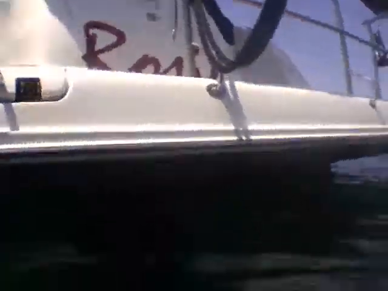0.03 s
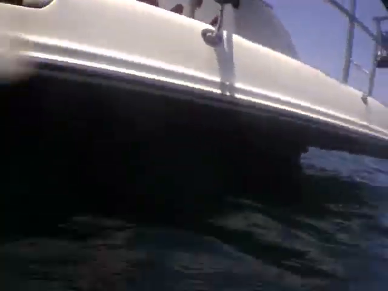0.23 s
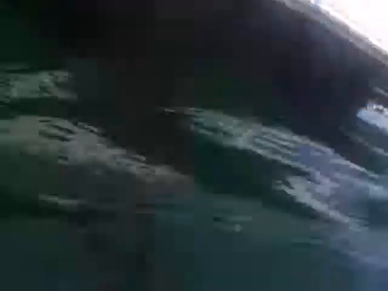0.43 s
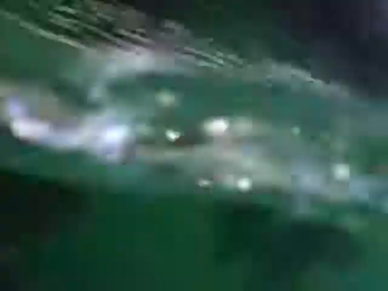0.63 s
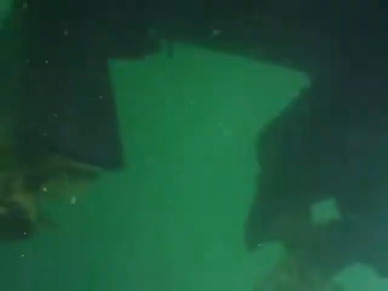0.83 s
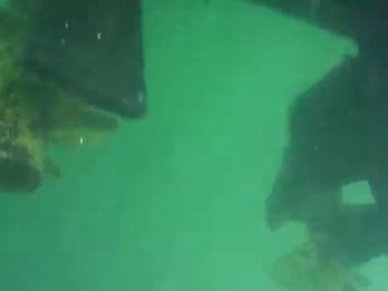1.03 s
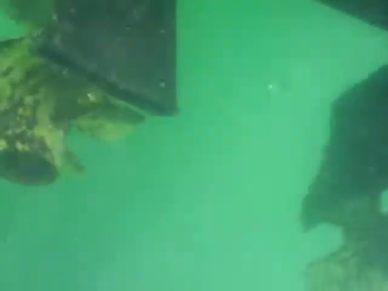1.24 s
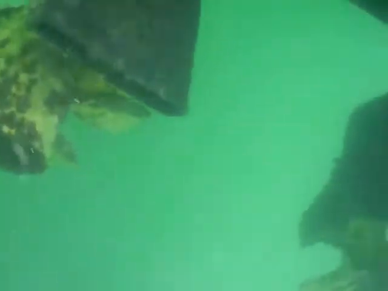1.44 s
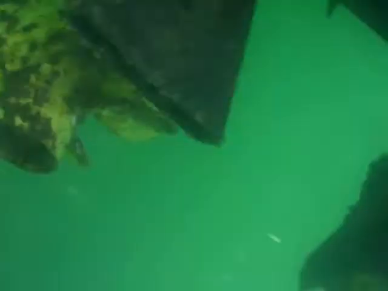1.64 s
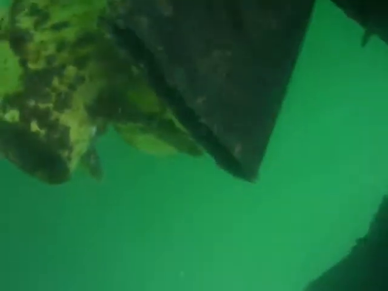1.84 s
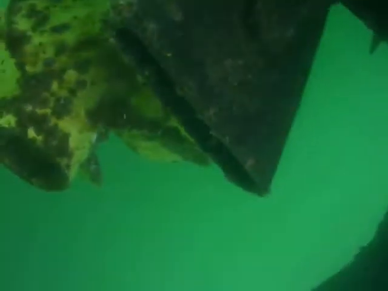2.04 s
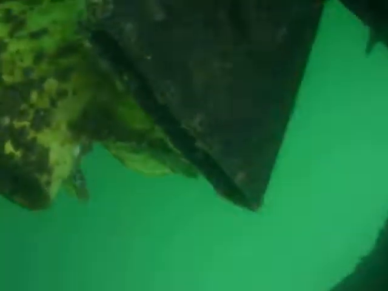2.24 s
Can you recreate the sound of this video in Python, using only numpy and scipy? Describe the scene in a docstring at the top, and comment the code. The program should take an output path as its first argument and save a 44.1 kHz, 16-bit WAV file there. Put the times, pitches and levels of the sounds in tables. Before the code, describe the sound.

Gurgling splash as a cased camera is dunked beside a boat, after handling bumps, then dull glugs

```python
"""A hand rubs and bumps a camera's watertight case beside a boat, then the case plunges under with a gurgle.
Rubbing is coloured noise; knocks and pushes are heavily damped rings; sharp ticks are short noise bursts.
Air pockets ring one by one over froth, fizz and spray, made of random small bubbles and noise.
Under water, dull knocks, a brief scrape, low glugs and a slow sway remain.
The camera's own hiss, whine and tiny ticking run throughout, and a faint whirr joins late."""
import sys
import numpy as np
from scipy import signal
from scipy.fft import rfft, irfft, next_fast_len
from scipy.io import wavfile

SR = 44100
rng = np.random.default_rng(int(sys.argv[2]) if len(sys.argv) > 2 else 0)


def master(y):
    """Save y as 16-bit WAV."""
    cut = np.clip(np.atleast_2d(y).T, -1, 1)
    pcm = np.round(cut * 32767)  # scale
    wavfile.write(sys.argv[1], SR, pcm.astype(np.int16))


N = 101429  # length in samples

# Camera hiss colour. Each row: frequency in Hz, relative level in dB.
HISS_COLOUR = [(530, -6), (900, -9), (1370, -15.5), (1750, -13), (2070, -9), (2480, -16), (2890, -17.5),
               (13800, -15), (15500, -28)]
HISS_DB = -69.5
# Colour of the faint whirr. Each row: frequency in Hz, relative level in dB.
WHIRR_COLOUR = [(1000, -45), (1750, -3), (2080, -10), (2350, -60)]
WHIRR_START_S, WHIRR_FADE_S, WHIRR_DB = 1.795, 0.11, -74.5
WHINE_HZ, WHINE_DB = 7500, -82
# Tiny falling chirps of the electronics
BUZZ_FIRST_S, BUZZ_PERIOD_S, BUZZ_LENGTH_S = 0.017, 0.0346, 0.0042
BUZZ_START_HZ, BUZZ_FALL_HZ_PER_S = 7260, 650000
BUZZ_DB, BUZZ_VARIATION_DB = -64, 4  # mean and standard deviation

# Hand rubbing on the case. Each row: time in seconds, level in dB.
RUB_LEVEL = [(0, -55), (.045, -46), (.08, -54.5), (.135, -73), (.2, -52.5), (.278, -52.5), (.30, -57),
             (.35, -52.5), (.44, -82), (.56, -63), (.68, -76), (1.6, -82), (1.67, -62), (1.73, -78)]
# Colour of the rubbing. Each row: frequency in Hz, relative level in dB.
RUB_COLOUR = [(200, -18.5), (330, 2), (490, -18.5), (650, -5), (1430, 1.5), (1610, -2), (4330, -9.5),
              (6610, -24), (15000, -48)]

# Low churning of water. Each row: time in seconds, level in dB.
CHURN_LEVEL = [(0, -66.5), (.3, -54), (.56, -64.5), (.64, -50), (1.05, -52), (1.3, -58), (1.48, -53.5),
               (1.65, -47), (1.83, -60), (1.97, -42.5), (2.08, -47), (2.14, -48.5), (2.24, -45)]
GLUGS_PER_S, GLUG_HZ, GLUG_SPREAD, GLUG_Q = 240, 200, 0.6, 2.4
# Slow sway of pressure, calmer below the surface. Each row: time in seconds, level in dB.
SWAY_LEVEL = [(.95, -39.5), (1.25, -41.5)]
# Colour of the sway. Each row: frequency in Hz, relative level in dB.
SWAY_COLOUR = [(25, 7), (50, -8), (100, -17), (1000, -100)]

# Sharp ticks on the case. Each row: start in seconds, level in dB.
TICKS = [(0.279, -34), (0.292, -40), (0.401, -47), (0.473, -47), (0.4888, -43.5), (0.643, -28.5),
         (.656, -30), (0.667, -29.5), (0.688, -38), (0.713, -34.5), (0.766, -34), (0.7815, -30),
         (0.85, -35), (0.876, -25), (1.009, -30.5), (1.058, -48), (1.2613, -35), (1.328, -51)]
# Colour of the ticks. Each row: frequency in Hz, relative level in dB.
TICK_COLOUR = [(200, 11.5), (1200, 10), (4200, 2), (5500, -8.5), (10500, -23.5), (13000, -22),
               (16000, -29.5)]
TICK_ATTACK_S, TICK_T60_S = 0.000086, 0.023

# Slow pushes of hand and water. Each row: start in seconds, pitch in Hz, level in dB,
# sharpness Q (at least 1 is used).
PUSHES = [(0.279, 43.4, -8.5, 1.8), (.303, 62, -21, 5), (0.393, 29.4, -16, 2.8), (0.4757, 59.3, 3.5, 0.8),
          (0.683, 23.7, -21, 2.3)]
PUSH_ONSET_S = 0.015
# Dull knocks. Each row: start in seconds, pitch in Hz, level in dB before the case colours it.
KNOCKS = [(0.4208, 176, -17.5), (.4855, 220, -12), (0.6431, 388, -3), (1.140, 163, -33.5),
          (1.2513, 420, -13), (1.3996, 195, -25.5), (1.512, 230, -33), (1.5501, 155, -34),
          (1.6207, 176, -30.5), (1.6993, 195.3, -27.5), (1.7553, 174.7, -23), (1.954, 450, -19),
          (1.9654, 162, -24.5), (2.0211, 321, -16), (2.0425, 216, -19), (2.1034, 222, -21),
          (2.157, 154.2, -20), (2.2322, 167, -37)]
KNOCK_Q, KNOCK_ONSET_S = 1.6, 0.0015
# What the case walls let through, with their resonances. Each row: frequency in Hz, gain in dB.
CASE_COLOUR = [(40, -14), (125, 1.5), (175, -3), (225, -2.5), (270, -5.5), (325, -1.5), (440, -12),
               (650, 2.5), (850, -23), (3000, -56)]

# Froth round the case. Each row: time in seconds, level in dB.
FROTH_LEVEL = [(0.605, -63.5), (0.64, -53), (.73, -48.5), (0.791, -38.5), (.85, -39.5), (0.899, -41),
               (0.927, -58.5), (.937, -32), (0.957, -46), (1.029, -45.5), (1.078, -59.5), (1.3, -66.5)]
# Froth as heard through the case. Each row: frequency in Hz, gain in dB.
FROTH_COLOUR = [(450, -7), (820, 4.5), (1300, -5), (2000, 5.5), (2480, -11), (3000, -4.5), (4300, -7.5),
                (5400, -22), (15000, -35)]
FROTH_PER_S, FROTH_HZ, FROTH_SPREAD, FROTH_Q = 980, 1962, 0.7, 9.2
FROTH_RISE = 0.13  # share by which a small bubble's pitch climbs as it rings out
FIZZ_DB = -11  # relative to the froth level
# Fine bright spray as the surface closes over the case. Each row: time in seconds, level in dB.
SPRAY_LEVEL = [(.6, -75), (0.652, -51), (.75, -78), (.79, -70), (.815, -52), (0.874, -51.5), (.89, -80)]
SPRAY_PER_S, SPRAY_HZ, SPRAY_SPREAD, SPRAY_Q = 200, 10700, 0.9, 14
SWARM_VARIATION_DB = 5  # two random draws of up to this much add for each bubble

# Air pockets that ring as they pinch off. Each row: start in seconds, pitch in Hz, level in dB,
# sharpness Q.
AIR_POCKETS = [(0.6302, 4120, -31.5, 23), (0.6431, 1283, -7.5, 3.3), (.651, 3840, -20.5, 8.7),
               (0.666, 3025, -16, 16.4), (0.6895, 1930, -16.5, 5.4), (0.7008, 690, -16, 11),
               (0.7147, 3810, -19, 18), (0.7352, 1957, -24, 23), (0.7428, 814, -16, 5),
               (0.766, 1980, -10, 9.7), (0.7724, 1713, 3, 6.5), (0.7728, 905, -23.5, 13),
               (0.78, 2820, -3, 4), (.7885, 2059, -19, 12), (0.795, 3100, -14.5, 7.1),
               (0.8123, 8700, -34.5, 39), (.8135, 1970, -26.5, 10), (0.8176, 920, -17, 6),
               (.8495, 3280, -16, 5.7), (0.8677, 1360, -14.5, 3.7), (.8764, 735, -4.5, 7.8),
               (0.8796, 4420, -14, 11.5), (0.8873, 1730, -18, 8.5), (.907, 2880, -31, 19),
               (0.9109, 1225, -22, 10.3), (.9385, 1060, 1, 2.57), (0.9715, 3870, -15.5, 10.5),
               (1.0074, 775, -11, 9), (1.0219, 800, -24.5, 10.8), (1.022, 2030, -25, 10.8),
               (1.0541, 670, -8.5, 3.5), (1.0555, 1722, -28.5, 24), (1.098, 1750, -28, 17.4),
               (1.140, 800, -36, 3.4), (1.187, 1840, -44, 14), (1.2618, 7430, -13.5, 3.74),
               (1.2625, 950, -27.5, 2.7), (1.269, 3970, -31.5, 12), (1.3274, 1050, -42, 7.7)]
POCKET_RISE = 0.048  # share by which an air pocket's pitch climbs as it rings out
ONSET_CYCLES = 0.89  # soft start of every bubble, in periods of its own pitch
NECK_S = 0.000092  # time for an air pocket's neck to close

# Colour of the short answer of hull and case. Each row: frequency in Hz, relative level in dB.
ECHO_COLOUR = [(300, -17), (850, 8), (2100, -1), (2450, -8), (3000, -3.5), (5500, -27.5)]
ECHO_DB, ECHO_T60_S, ECHO_ONSET_S = -15.5, 0.01, 0.003
TOP_HZ = 15850  # band limit of the camera


def amp(db):
    """Turn decibels into an amplitude factor."""
    return 10 ** (np.asarray(db) / 20)


def unit(x):
    """Scale a sound to rms 1."""
    return x / np.sqrt(np.mean(x ** 2) + 1e-20)


def along(points, hz):
    """Read a curve of (Hz, value) points on a log frequency axis."""
    f, v = np.transpose(points)
    return np.interp(np.log(hz + 1), np.log(f + 1), v)


def level(rows):
    """Gain per sample from (seconds, dB) points."""
    return amp(np.interp(np.arange(N) / SR, *np.transpose(rows)))


def filtered(x, response):
    """Multiply the spectrum of x by a response of frequency."""
    size = next_fast_len(N + SR // 2)
    hz = np.fft.rfftfreq(size, 1 / SR)
    return irfft(rfft(x, size) * response(hz), size)[:N]


def noise(colour):
    """Coloured noise of rms 1."""
    white = rng.standard_normal(N)
    return unit(filtered(white, lambda hz: amp(along(colour, hz))))


def through(x, colour):
    """Pass x through a body whose minimum-phase response rings only after each impulse."""
    size = 16384
    gain = amp(along(colour, np.fft.rfftfreq(size, 1 / SR)))
    # Folding the cepstrum onto positive time gives minimum phase
    cepstrum = irfft(np.log(gain))
    cepstrum[1:size // 2] *= 2
    cepstrum[size // 2 + 1:] = 0
    impulse = irfft(np.exp(rfft(cepstrum)))
    return signal.fftconvolve(x, impulse)[:N]


def add(out, s, sound):
    """Mix a sound in at time s."""
    part = out[max(0, round(s * SR)):][:len(sound)]
    part += sound[:len(part)]


def ring(hz, q, onset_s, rise=0, size=8192):
    """A damped oscillation with a soft start, whose pitch may climb as it dies."""
    t = np.arange(size) / SR
    fade = np.exp(-np.pi * hz * t / max(q, 1))
    pitch = hz * (1 + rise * (1 - fade))
    phase = 2 * np.pi * np.cumsum(pitch) / SR
    onset = 1 - np.exp(-(t / onset_s) ** 2)
    return np.sin(phase) * fade * onset


def swarm(start, end, per_s, centre_hz, spread, q, rise):
    """Bubbles of random time, pitch and strength, together of rms 1 from start to end."""
    out = np.zeros(N)
    draws = rng.uniform(-1, 1, (2000, 5))
    count = int(per_s * (end - start))
    for when, a, b, c, d in draws[:count]:
        s = start + (end - start) * (when + 1) / 2
        hz = centre_hz * np.exp(spread * (a + b))  # two draws favour the centre
        strength = amp(SWARM_VARIATION_DB * (c + d))
        add(out, s, strength * ring(hz, q, ONSET_CYCLES / hz, rise, size=2048))
    return unit(out) * np.sqrt((end - start) * SR / N)


def hiss():
    """The camera's own noise, steady and coloured."""
    return amp(HISS_DB) * noise(HISS_COLOUR)


def whine():
    """A thin steady whine, one pure sine."""
    return amp(WHINE_DB) * np.sin(2 * np.pi * WHINE_HZ * np.arange(N) / SR)


def buzz():
    """Regular tiny ticks of the electronics, each a short sine of falling pitch."""
    out = np.zeros(N)
    t = np.arange(int(BUZZ_LENGTH_S * SR)) / SR
    cycles = (BUZZ_START_HZ - BUZZ_FALL_HZ_PER_S * t / 2) * t
    chirp = np.hanning(len(t)) * np.sin(2 * np.pi * cycles)
    for s in np.arange(BUZZ_FIRST_S, N / SR, BUZZ_PERIOD_S):
        add(out, s, amp(BUZZ_DB + rng.normal(0, BUZZ_VARIATION_DB)) * chirp)
    return out


def rub():
    """Friction noise: a soft rustle while the camera is lowered, a brief scrape under water."""
    return level(RUB_LEVEL) * noise(RUB_COLOUR)


def glugs():
    """Low churning: a string of dull bubbles heard through the resonant case."""
    low_bubbles = swarm(0, N / SR, GLUGS_PER_S, GLUG_HZ, GLUG_SPREAD, GLUG_Q, 0)
    return level(CHURN_LEVEL) * unit(through(low_bubbles, CASE_COLOUR))


def sway():
    """Slow random swings of pressure, as very low noise."""
    return level(SWAY_LEVEL) * noise(SWAY_COLOUR)


def ticks():
    """Fingers, drops and bursting bubbles snap against the case: quick bursts of noise."""
    envelope = np.zeros(N)
    t = np.arange(SR // 10) / SR
    attack = 1 - np.exp(-t / TICK_ATTACK_S)
    for s, db in TICKS:
        add(envelope, s, attack * amp(db - 60 * t / TICK_T60_S))
    return envelope * noise(TICK_COLOUR)


def pushes():
    """Slow pushes of hand and water, as low damped swings of pressure."""
    out = np.zeros(N)
    for s, hz, db, q in PUSHES:
        add(out, s, amp(db) * ring(hz, q, PUSH_ONSET_S))
    return out


def knocks():
    """Heavily damped knocks that set the case humming."""
    blows = np.zeros(N)
    for s, hz, db in KNOCKS:
        add(blows, s, -amp(db) * ring(hz, KNOCK_Q, KNOCK_ONSET_S))  # first swing is negative
    return through(blows, CASE_COLOUR)


def froth():
    """Small ringing bubbles on a bed of fizz noise, heard through the case."""
    start, end = FROTH_LEVEL[0][0], FROTH_LEVEL[-1][0]
    small = swarm(start, end, FROTH_PER_S, FROTH_HZ, FROTH_SPREAD, FROTH_Q, FROTH_RISE)
    fizz = amp(FIZZ_DB) * noise(FROTH_COLOUR)
    return level(FROTH_LEVEL) * (through(small, FROTH_COLOUR) + fizz)


def spray():
    """The tiniest bubbles, ringing high and at steady pitch."""
    start, end = SPRAY_LEVEL[0][0], SPRAY_LEVEL[-1][0]
    return level(SPRAY_LEVEL) * swarm(start, end, SPRAY_PER_S, SPRAY_HZ, SPRAY_SPREAD, SPRAY_Q, 0)


def air_pockets():
    """Large air pockets of the plunge, each ringing on one rising note as it pinches off."""
    out = np.zeros(N)
    for s, hz, db, q in AIR_POCKETS:
        onset_s = ONSET_CYCLES / hz + NECK_S
        add(out, s, amp(db) * ring(hz, q, onset_s, POCKET_RISE))
    return out


def echo(x):
    """The short diffuse answer of hull and case, a decaying coloured noise tail."""
    t = np.arange(SR // 5) / SR
    envelope = amp(-60 * t / ECHO_T60_S) * (1 - np.exp(-t / ECHO_ONSET_S))
    tail = noise(ECHO_COLOUR)[:len(t)] * envelope
    tail /= np.linalg.norm(tail)
    return amp(ECHO_DB) * signal.fftconvolve(x, tail)[:N]


def whirr():
    """A faint band of noise that fades in late."""
    fade_in = np.clip((np.arange(N) / SR - WHIRR_START_S) / WHIRR_FADE_S, 0, 1)
    return fade_in * amp(WHIRR_DB) * noise(WHIRR_COLOUR)


def scene():
    """Mix the handling, the plunge with its echo, the water around and the camera's own noise."""
    camera = hiss() + whine() + buzz() + whirr()
    handling = rub() + pushes() + knocks()
    water = glugs() + sway() + froth() + spray()
    splash = ticks() + air_pockets()
    return (camera + handling + water + splash + echo(splash))[None]


def record(dry):
    """The camera keeps nothing above its band limit."""
    return filtered(dry[0], lambda hz: hz < TOP_HZ)[None]


dry = scene()
out = record(dry)
master(out)
```